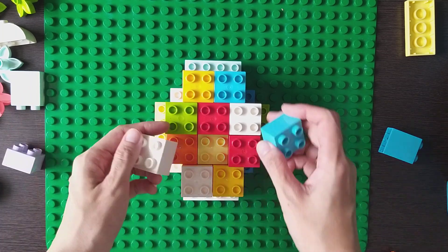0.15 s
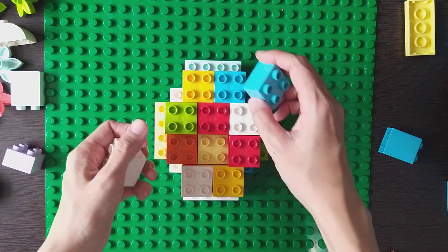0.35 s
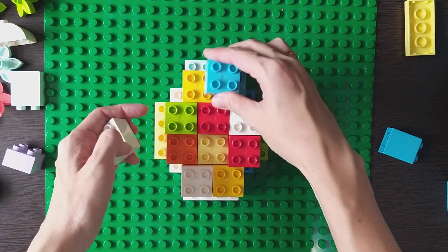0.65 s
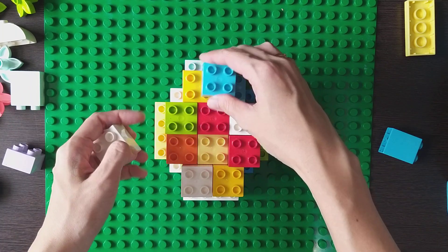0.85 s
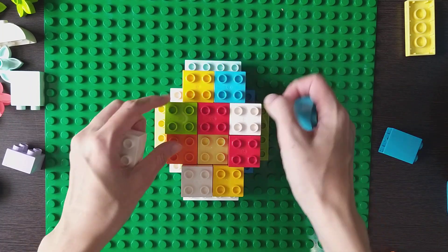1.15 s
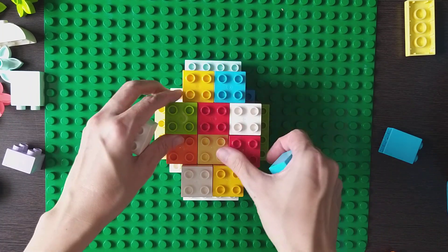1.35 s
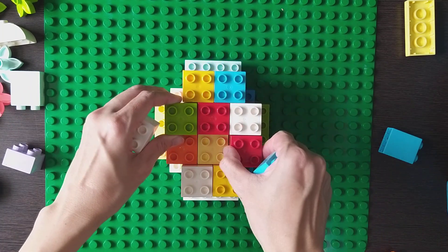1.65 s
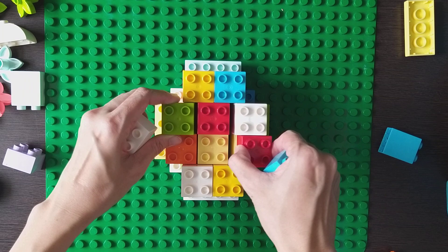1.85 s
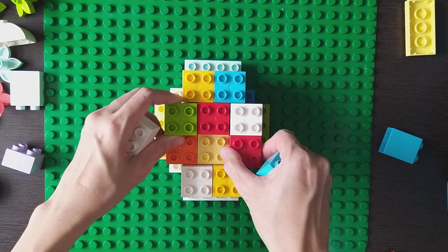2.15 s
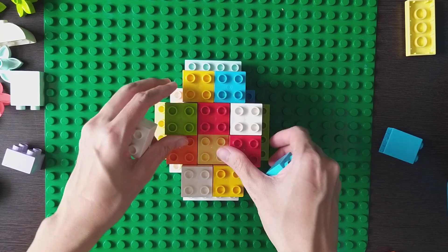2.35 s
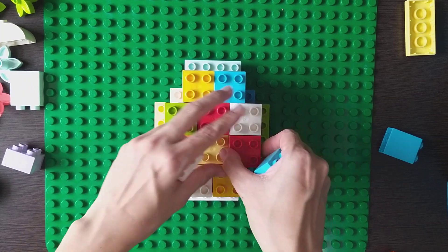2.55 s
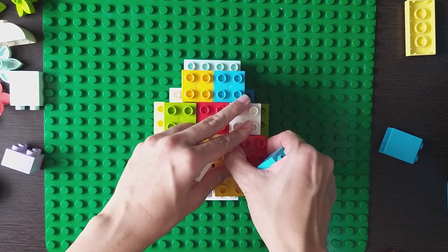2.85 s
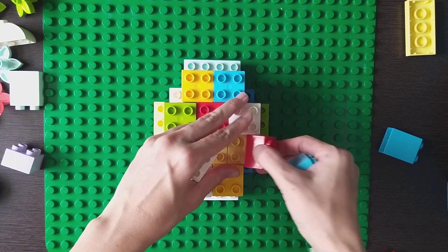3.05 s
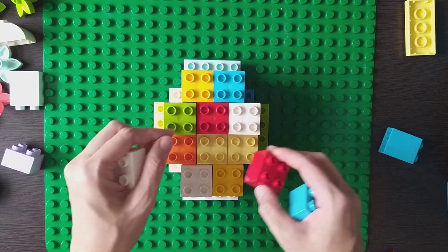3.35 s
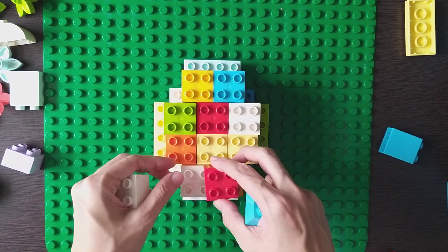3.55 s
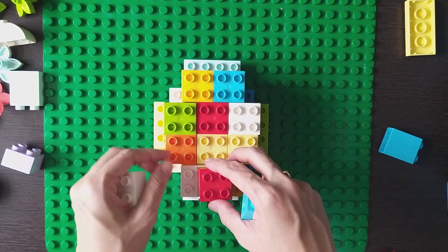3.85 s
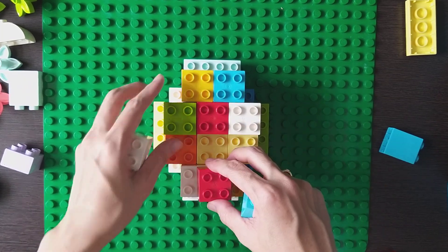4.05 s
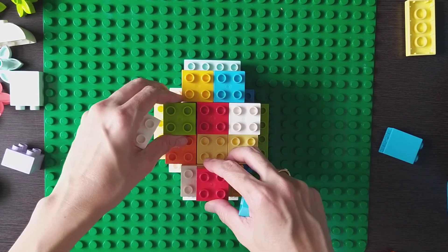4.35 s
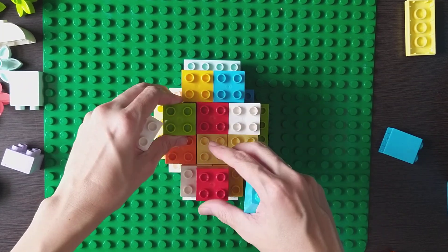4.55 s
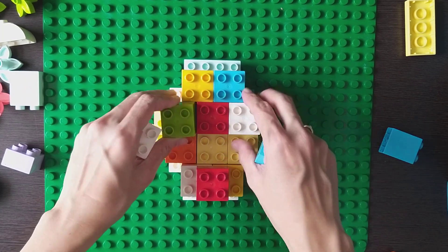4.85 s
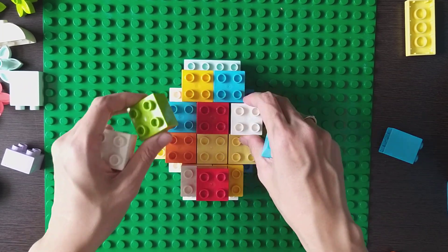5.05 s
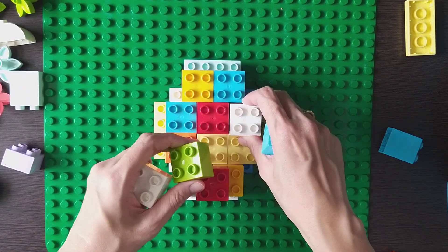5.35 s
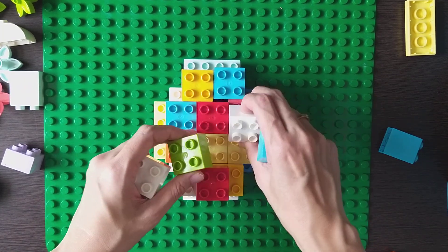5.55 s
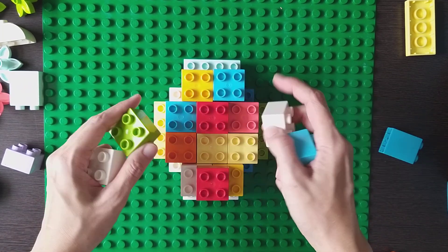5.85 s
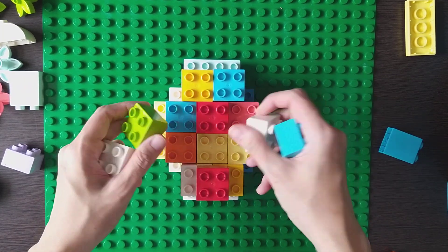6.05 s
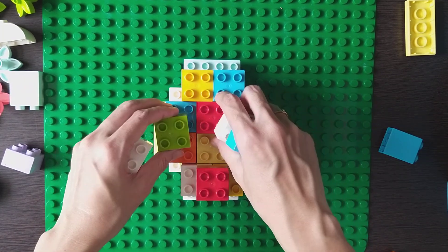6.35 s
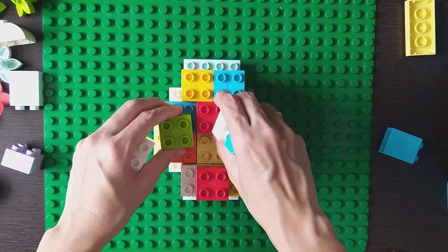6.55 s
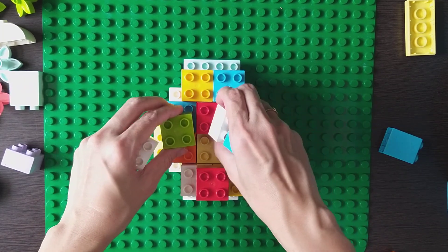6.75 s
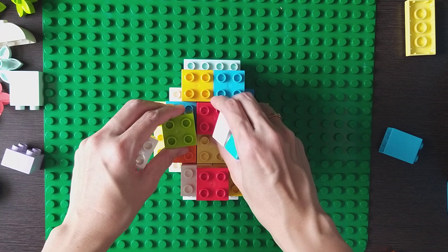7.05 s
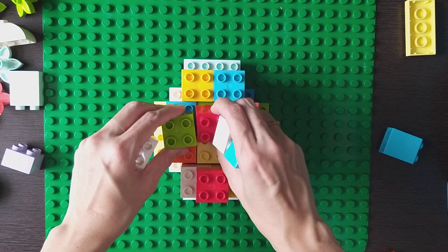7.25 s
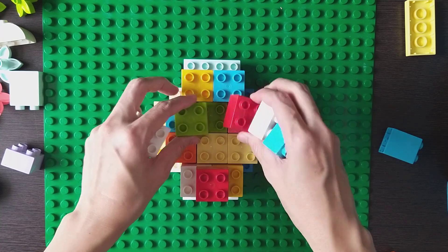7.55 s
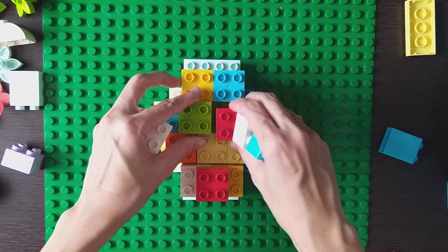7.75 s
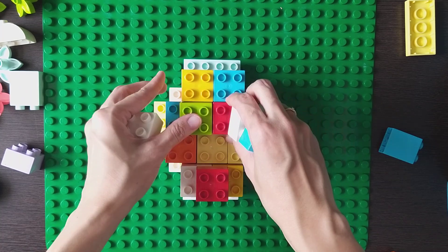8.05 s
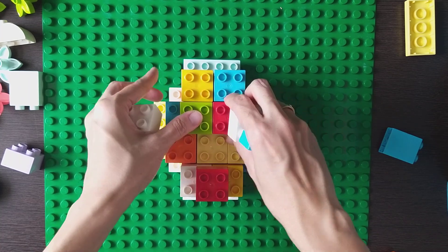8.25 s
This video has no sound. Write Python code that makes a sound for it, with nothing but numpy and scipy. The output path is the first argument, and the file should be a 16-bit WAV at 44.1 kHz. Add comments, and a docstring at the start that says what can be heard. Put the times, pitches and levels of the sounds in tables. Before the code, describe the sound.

Chunky plastic building bricks are knocked together in the hands and snapped onto a studded plate on a table, over faint hiss and low rumble.

```python
"""Over faint hiss and a low rumble, one engine hums past outside; fingertips rub plastic.
Hollow toy bricks are pressed onto a baseplate on a table and knocked together; now and then an edge scrapes.
A second engine swells midway; then come the loudest knocks in the hand, presses in quick runs, and a last knock.
Damped modes of cavity, walls, plate and table ring at each contact; noise bursts crack as studs snap.
Noise makes rubbing, hiss and rumble; sines make exhaust notes; decaying noise bands make the small room."""
import sys
import numpy as np
from scipy import signal
from scipy.fft import rfft, irfft, next_fast_len
from scipy.io import wavfile

SR = 44100
rng = np.random.default_rng(int(sys.argv[2]) if len(sys.argv) > 2 else 0)


def bounce(signal):
    """Save signal as a 16-bit WAV file at the path given by the first command-line argument."""
    frames = np.transpose(np.atleast_2d(signal))
    limited = np.clip(frames, -1, 1)
    pcm = np.round(limited * 32767).astype(np.int16)
    wavfile.write(sys.argv[1], SR, pcm)


N = 370881
HIT_SIZE = SR // 5   # samples per contact

# low rumble that rises and falls, partly with the handling: start_s [s], level_db [dB]
RUMBLE_LEVELS = [(0.0, -65.5), (0.63, -57.5), (1.22, -55.5), (1.78, -62), (2.06, -52), (3.35, -61),
                 (4.8, -53.5), (5.76, -57.5), (6.11, -61.5), (8.08, -57), (8.41, -55)]
# low rumble: freq_hz [Hz], density_db [dB per Hz]
RUMBLE_COLOUR = [(20, -27), (40, -21), (50, -2), (63, 0), (100, 0), (160, 0), (220, -12.5), (320, -17),
                 (450, -20.5), (800, -44.5), (2000, -58)]
# engines outside, one list each: start_s [s], turns_hz [turns per s], level_db [dB]
ENGINE_CURVES = [
    [(0, 29.6, -69), (.65, 32.2, -54), (1.35, 30.1, -54.5), (1.7, 26.8, -67), (2.7, 39.3, -57),
     (3.2, 31, -75)],
    [(4.1, 37, -77), (4.55, 45.2, -45.5), (4.75, 43.5, -56), (5.05, 44.5, -52), (5.4, 43.3, -61.5),
     (6.6, 44, -68.5), (7.3, 51.6, -66), (8.4, 46, -67.5)],
]
# exhaust notes, one list per engine: multiple [of turning rate], level_db [dB]
EXHAUST_ORDERS = [
    [(2, -4), (3, -17), (4, -1), (6, -5.5)],
    [(2, -5.5), (3, -10), (4, -1)],
]
# faint hiss: freq_hz [Hz], density_db [dB per Hz]
HISS_COLOUR = [(300, 8.5), (1000, -2), (2800, -4.5), (5000, -4.5), (9000, -7), (15000, -6.5)]
# small room: freq_hz [Hz], wet_db [dB, reverberant against direct energy], t60_s [s]
ROOM_BANDS = [(100, -5, 0.31), (302, -0.5, .36), (600, 0, .3), (1200, -3, 0.33), (2780, -4.5, 0.38),
              (5800, -4.5, 0.34), (9900, -5.5, 0.4), (15000, -2, 0.25)]
# fingertip strokes: start_s [s], end_s [s], level_db [dB]
RUB_STROKES = [(0, 0.022, -74.5), (1.587, 1.876, -80.5), (2.329, 2.381, -74), (2.695, 3.06, -69),
               (4.165, 4.2, -77), (4.872, 5.0, -73.5), (6.838, 7.43, -72.5), (7.892, 8.41, -63)]
# skin on plastic: freq_hz [Hz], density_db [dB per Hz]
SKIN_COLOUR = [(500, 0.5), (1500, -2), (3000, -0.5), (6000, -1.5), (8000, -10.5), (15000, -25.5)]
# bricks grate on their neighbours: start_s [s], end_s [s], level_db [dB]
EDGE_SCRAPES = [(0.71, 0.762, -62), (2.079, 2.168, -74.5), (2.333, 2.377, -93), (2.825, 2.866, -54.5),
                (3.677, 3.76, -77), (5.539, 5.6, -49), (6.372, 6.46, -51), (6.848, 6.971, -63),
                (7.243, 7.346, -71), (7.6, 7.65, -51), (7.81, 7.944, -62), (8.04, 8.19, -66)]
# deep table-top modes: freq_hz [Hz], level_db [dB], t60_s [s]
TABLE_MODES = [(59.6, -11, .3), (89, -7, 0.057), (102.5, -1, 0.3), (175, -14, 0.3)]
# bending modes of the plate lying on the table: freq_hz [Hz], level_db [dB], t60_s [s]
BENDING_MODES = [(250, 1.5, 0.091), (304, 5.5, .045), (336.2, 0, 0.28), (445, 1, 0.021), (540, -7.5, 0.035),
                 (760, -10, 0.0067), (1066, -8, 0.06)]
# clacking baseplate modes: freq_hz [Hz], level_db [dB], t60_s [s]
PLATE_MODES = [(574, -3, 0.0056), (680, -6, 0.033), (830, -1, 0.0098), (973, -5, 0.014), (1180, 3, 0.016),
               (1230, -3, 0.013), (1582, 6.5, 0.0096), (1730, 0, 0.05), (2088, 3.5, 0.022)]
# weaker, crowded modes of a hollow brick: freq_hz [Hz], level_db [dB], t60_s [s]
SHELL_MODES = [(2450, -8.5, .016), (2474, 3, 0.023), (2798, -1, 0.048), (2805, -7.5, 0.0076),
               (3110, 0.5, 0.022), (3100, 3, 0.012), (3720, -9, 0.012), (4010, -2.5, 0.012),
               (4000, -9.5, 0.018), (4580, -14.5, 0.0053)]
# high modes of brick corners and inner tubes: freq_hz [Hz], level_db [dB], t60_s [s]
CORNER_MODES = [(4750, -3.5, 0.036), (5230, -1, 0.019), (5950, 2.5, 0.027), (6670, -8.5, 0.013),
                (8770, 2, .04), (9800, -14.5, .025), (12000, -12, .025), (12750, -5.5, .02),
                (14000, -18, .015)]
# crack of a stud slipping into its seat: freq_hz [Hz], density_db [dB per Hz]
SNAP_COLOUR = [(1000, -27.5), (3500, 1.5), (5000, -2.5), (6500, 0.5), (7800, -9), (9500, -7), (12500, -5.5),
               (15500, -8)]
# bricks knocked together in the hand:
# start_s [s], cavity_db [dB], cavity_hz [Hz], wall_db [dB], wall_hz [Hz], snap_db [dB]
HAND_KNOCKS = [(0.889, -40, 2537, -35, 4280, -44), (1.1249, -29.5, 3053, -30.5, 3845, -54.5),
               (3.07, -52.5, 3080, -48, 4830, -51.5), (3.605, -43.5, 2960, -51, 3800, -68),
               (3.6335, -40, 3000, -58, 3600, -66), (5.831, -20, 2625, -25.5, 3870, -34.5),
               (5.847, -32, 2670, -36.5, 3890, -40), (6.029, -29.5, 2500, -29.5, 4400, -37.5),
               (6.0367, -16.5, 2406, -23.5, 3820, -31.5), (6.0565, -26, 2410, -26.5, 4610, -37.5),
               (6.1914, -13, 2745, -16, 4030, -26.5), (6.344, -32, 2550, -39, 3980, -51),
               (6.354, -23, 2740, -28, 3887, -45), (7.349, -46.5, 2820, -54, 3800, -52.5),
               (7.368, -40.5, 2934, -47.5, 3830, -56), (7.5265, -56, 2740, -59, 3890, -60.5),
               (8.3445, -31.5, 2605, -46.5, 4350, -56.5)]
# brick set down, pressed home or pulled off:
# start_s [s], thud_db [dB], thud_hz [Hz], clack_db [dB], cavity_db [dB], cavity_hz [Hz], snap_db [dB]
PLATE_PRESSES = [(0.658, -41, 260, -41, -32, 2660, -44), (0.7034, -43.5, 314, -30.5, -23.5, 2570, -38),
                 (0.744, -51.5, 255, -39.5, -34, 2770, -48.5), (0.8876, -47, 230, -43.5, -37, 2600, -42.5),
                 (2.1707, -33, 435.3, -48, -54.5, 3185, -43.5), (2.811, -33.5, 284, -41, -43, 2310, -44),
                 (2.8195, -44, 294, -48, -44.5, 1970, -44.5), (3.548, -55, 276, -42, -36, 2910, -57.5),
                 (3.6776, -44, 270, -37, -34.5, 2430, -51.5), (3.682, -54, 263, -53.5, -37.5, 2980, -62),
                 (4.7246, -41.5, 235, -40.5, -53, 1940, -44.5), (5.529, -37, 234, -44, -45.5, 1930, -46),
                 (5.537, -38.5, 223, -41, -31.5, 1970, -34), (5.62, -46.5, 210, -42, -33.5, 2050, -40),
                 (6.388, -48, 243, -51, -28, 2650, -57), (6.431, -46.5, 272, -45, -29.5, 2790, -39.5),
                 (6.449, -48.5, 245, -44.5, -32, 2700, -43.5), (6.801, -50.5, 234, -81, -42.5, 2650, -55.5),
                 (7.026, -53, 231, -65, -44, 2520, -62.5), (7.093, -52, 227, -58.5, -41.5, 2400, -64),
                 (7.233, -40, 231, -55, -50.5, 2232, -61), (7.244, -48.5, 234, -53.5, -44.5, 2420, -66),
                 (7.5844, -47.5, 236, -37.5, -26.5, 2740, -43.5), (7.607, -44, 238, -31, -30, 2870, -37.5),
                 (7.6132, -45.5, 232, -40, -48, 2700, -46), (7.7934, -42, 300, -36.5, -33.5, 2830, -47),
                 (7.8377, -39.5, 275, -40.5, -43, 2630, -49), (8.0225, -42, 255, -44.5, -38, 2523, -43.5),
                 (8.1403, -41, 235, -47.5, -51.5, 1800, -55.5)]
# fingers nudge seated bricks: start_s [s], thud_db [dB], clack_db [dB]
SEATED_NUDGES = [(2.121, -50.5, -61.5), (2.9568, -56, -64), (3.072, -52, -75.5), (3.805, -52, -75),
                 (4.162, -55, -65.5), (4.884, -54.5, -59.5), (5.323, -50.5, -67), (5.7297, -58, -60.5),
                 (6.398, -48, -49.5), (6.531, -47.5, -62), (6.661, -52, -62), (6.85, -50.5, -64),
                 (6.862, -51.5, -57), (7.911, -55, -58)]

# half-octave room bands
BAND_EDGES_HZ = 22 * 2 ** np.arange(0, 9.6, .5)
BAND_CENTRES_HZ = np.sqrt(BAND_EDGES_HZ[1:] * BAND_EDGES_HZ[:-1])

HISS_DB = -73.5
STROKE_FADE_DB_PER_S = 129   # onset and decay of a stroke
SLIPS_PER_SCRAPE = 12   # mean count: similar travel each time, so a slow scrape slips less often
SOFT_PUSH_HZ = 242.2   # thud note of a slow, soft push
THUMP_DB_PER_OCTAVE = -17   # a quicker push rocks the table less
KNOCK_THUD_DB = -65   # the hand keeps nearly all of a knock from the table
KNOCK_CLACK_DB, KNOCK_SHEEN_DB = -28.5, -7.5   # plate re cavity; sheen re snap
KNOCK_PAN_DB, PRESS_PAN_DB = 1, 3.5   # left re right
PRESS_WALL_DB, PRESS_SHEEN_DB = -4, -7.5   # wall re cavity in a firm press; sheen re snap
FIRM_CLACK_DB, WALL_DB_PER_CLACK_DB = -37.5, .33   # clack of a firm press; wall gain per clack gain
SHEEN_DB_PER_SNAP_DB = .25   # extra sheen per dB of snap above cavity
WALL_HZ, WALL_SPREAD = 3846, .015   # mean wall note on the plate; relative spread
NUDGE_CAVITY_HZ, NUDGE_CAVITY_DB, NUDGE_SNAP_DB = 2430, 3.5, -3   # levels re clack


def from_db(db):
    """Decibels to gain."""
    return 10 ** (np.asarray(db) / 20)


def rms_one(x):
    """Scale each channel to an rms of 1."""
    return x / np.sqrt(np.mean(x ** 2, axis=-1, keepdims=True) + 1e-20)


def hit_level(x, db):
    """Scale each channel of a hit to the energy of 10 ms of sound at db."""
    energy = np.sum(x ** 2, axis=-1, keepdims=True)
    return from_db(db) * x * np.sqrt(SR / 100 / energy)


def in_time(rows):
    """Interpolate the columns of a curve at every sample."""
    time_s, *columns = np.transpose(rows)
    return [np.interp(np.arange(N) / SR, time_s, column) for column in columns]


def at_hz(points, hz):
    """Read the columns of a spectrum on a log-frequency axis."""
    freq_hz, *columns = np.transpose(points)
    return [np.interp(np.log(hz + 1), np.log(freq_hz), column) for column in columns]


def high_pass(x, hz):
    """Small parts radiate little below their first mode."""
    return signal.sosfilt(signal.butter(3, hz, "high", fs=SR, output="sos"), x)


def low_pass(x, hz):
    """A contact that lasts a while leaves out the highest tones."""
    return signal.sosfilt(signal.butter(4, min(hz, .45 * SR), fs=SR, output="sos"), x)


def coloured(spectrum, size, likeness):
    """Stereo noise of a given colour and left-right likeness; rms 1."""
    mid, side = rng.standard_normal((2, next_fast_len(size, True)))
    alike = np.clip(likeness, 0, 1)
    white = np.sqrt(1 + alike) * mid + np.sqrt(1 - alike) * np.array([side, -side])
    density_db, = at_hz(spectrum, np.fft.rfftfreq(len(mid), 1 / SR))
    noise = irfft(rfft(white) * from_db(density_db), len(mid))
    return rms_one(noise[:, :size])


def drift(rate_hz):
    """Slow random curve through knots of spread 1, rate_hz knots per second."""
    steps = np.arange(N) / SR * rate_hz
    knots = rng.standard_normal(2000)
    return np.interp(steps, np.arange(len(knots)), knots)


def ring(force, hz, t60_s):
    """One damped mode driven by a force, a two-pole resonator; rms 1."""
    radius = from_db(-60 / (t60_s * SR))
    angle = 2 * np.pi * hz / SR
    floor = 1e-18 * (-1) ** np.arange(force.shape[-1])   # tiny alternating input, inaudible
    poles = [1, -2 * radius * np.cos(angle), radius * radius]
    return rms_one(signal.lfilter([1, 0, -1], poles, force + floor))


def body(force, modes, scatter_db, detune):
    """Every contact finds a body's modes with new strengths and slightly shifted pitch; rms 1."""
    shift = 1 + detune * rng.normal()
    total = 0
    for k, (hz, level_db, t60_s) in enumerate(modes):
        gain = from_db(level_db + scatter_db * rng.normal())
        total = total + (-1) ** k * gain * ring(force, hz * shift, t60_s)
    return rms_one(total)


def hiss():
    """Faint steady noise, nearly independent left and right."""
    return from_db(HISS_DB) * coloured(HISS_COLOUR, N, likeness=0.06)


def rumble():
    """Low noise that rises and falls, partly with the handling; nearly alike left and right."""
    level_db, = in_time(RUMBLE_LEVELS)
    return from_db(level_db) * coloured(RUMBLE_COLOUR, N, likeness=0.9)


def engines():
    """Low exhaust notes from outside: sines at multiples of each engine's unsteady turning rate."""
    out = np.zeros(N)
    for curve, orders in zip(ENGINE_CURVES, EXHAUST_ORDERS):
        turns_hz, engine_db = in_time(curve)
        phase = 2 * np.pi * np.cumsum(turns_hz * (1 + 0.0025 * drift(rate_hz=16))) / SR
        for multiple, order_db in orders:
            note_db = engine_db + order_db + 2.5 * drift(rate_hz=6)
            out = out + np.sqrt(2) * from_db(note_db) * np.sin(round(multiple) * phase)
    return out


def room(x):
    """Dense reflections that build up after the first wall and die away band by band."""
    t = np.arange(round(.7 * SR)) / SR
    build_up = np.clip((t - .006) / 0.0044, 0, 1)
    white = rng.standard_normal((2, 2, len(t)))   # neighbouring bands alternate sources
    response = 0
    for k, hz in enumerate(BAND_CENTRES_HZ):
        band = signal.butter(2, BAND_EDGES_HZ[k:k + 2], "band", fs=SR, output="sos")
        wet_db, t60_s = at_hz(ROOM_BANDS, hz)
        tail = build_up * from_db(-60 * t / t60_s)
        shared = 1 / (1 + (hz / 400) ** 2)   # long waves reach both microphones alike
        left, other = white[k % 2]
        right = np.sqrt(shared) * left + np.sqrt(1 - shared) * other
        noise = signal.sosfilt(band, [left, right])
        response = response + from_db(wet_db) * noise * tail / np.sqrt(np.sum(tail ** 2))
    return signal.fftconvolve(x, response, axes=1)[:, :N]


def fingers():
    """Skin sticks and slips on plastic: grainy hiss that swells, holds and fades with each stroke."""
    t = np.arange(N) / SR
    strokes_db = []
    for start_s, end_s, level_db in RUB_STROKES:
        outside_s = np.abs(t - np.clip(t, start_s, end_s))
        strokes_db.append(level_db - STROKE_FADE_DB_PER_S * outside_s)
    grain_db = 3.6 * drift(rate_hz=70)
    return from_db(np.max(strokes_db, axis=0) + grain_db) * coloured(SKIN_COLOUR, N, likeness=0.057)


def contact_force(chatter_s, chatter_db, bounce_s, bounce_db):
    """A blow as left, right and room channels: hard edges chatter, hands and table bounce it.
    Each microphone gets its own bounces; over all directions feeding the room the pattern averages out."""
    force = np.zeros((3, HIT_SIZE))
    force[:, 0] = 1
    lags = (rng.uniform(.1, 1, 4) * chatter_s * SR).astype(int)
    force[:2, lags] += from_db(chatter_db) * rng.choice([-1, 1], len(lags))
    for side in force[:2]:
        lags = (rng.uniform(.1, 1, 8) * bounce_s * SR).astype(int)
        side[lags] += from_db(bounce_db) * rng.normal(0, 1, len(lags))
    return force


def scrapes():
    """Edges slide in tiny uneven slips that tickle the plate and the brick walls."""
    out = np.zeros((3, N + HIT_SIZE))
    t = np.arange(HIT_SIZE) / SR
    for start_s, end_s, level_db in EDGE_SCRAPES:
        at = round(start_s * SR)
        sliding = t < np.clip(end_s - start_s, .01, .2)
        slipping = rng.random(HIT_SIZE) < SLIPS_PER_SCRAPE / sliding.sum()
        slips = slipping * rng.normal(0, 1, HIT_SIZE) * sliding
        slips[0] = 1   # the edge breaks loose
        blow = contact_force(chatter_s=0.00083, chatter_db=2.5, bounce_s=.009, bounce_db=-3)
        force = signal.fftconvolve([slips], blow, axes=1)[:, :HIT_SIZE]
        plate = body(force, PLATE_MODES, scatter_db=2.5, detune=0.066)
        walls = from_db(6.5) * body(force, SHELL_MODES, scatter_db=1.5, detune=0.035)
        grating = rms_one(low_pass(plate + walls, hz=5500))
        out[:, at:at + HIT_SIZE] += from_db(level_db) * grating * np.sqrt(sliding.mean())
    return out[:, :N]


def thumps():
    """Each push on the plate rocks the table top, the more so the softer and heavier it is."""
    out = np.zeros(N + HIT_SIZE)
    push = low_pass(signal.unit_impulse(HIT_SIZE), hz=220)
    pushes = []
    for start_s, thud_db, thud_hz, *_ in PLATE_PRESSES:
        pushes.append((start_s, thud_db + THUMP_DB_PER_OCTAVE * np.log2(thud_hz / SOFT_PUSH_HZ)))
    for start_s, level_db, *_ in pushes + list(SEATED_NUDGES):
        at = round(start_s * SR)
        rocking = body(push, TABLE_MODES, scatter_db=1.5, detune=0.038)
        out[at:at + HIT_SIZE] += hit_level(rocking, level_db)
    return out[:N]


def place(x, pan_db):
    """The nearer microphone hears a brick louder and up to two samples sooner."""
    left_gain, right_gain = rms_one(from_db([pan_db / 2, -pan_db / 2]))
    lag = round(np.clip(pan_db / 2, -1, 2))
    left = left_gain * np.roll(x[0], max(-lag, 0))
    right = right_gain * np.roll(x[1], max(lag, 0))
    return np.array([left, right, x[2]])


def thud_of(force, thud_hz):
    """The plate bends on the table: one strongest note plus its bending modes."""
    # long waves reach both sides nearly alike
    push = low_pass(np.array([force[0], 0.47 * force[0] + 0.44 * force[1], force[2]]), hz=910)
    strongest = ring(push, thud_hz, t60_s=.07)
    stiffer = (thud_hz / 290) ** .4   # a tightly seated stack raises all bending modes
    bending = [(hz * stiffer, level_db, t60_s) for hz, level_db, t60_s in BENDING_MODES]
    return strongest + from_db(3.5) * body(push, bending, scatter_db=2.0, detune=0.098)


def brick_of(force, cavity_db, cavity_hz, wall_db, wall_hz):
    """A hollow brick rings by its cavity, its walls and its crowded shell modes."""
    cavity = low_pass(high_pass(ring(force, cavity_hz, t60_s=.026), hz=1960), hz=4020)
    wall = low_pass(high_pass(ring(force, wall_hz, t60_s=0.015), hz=2780), hz=4900)
    shell = body(force, SHELL_MODES, scatter_db=2, detune=.025)
    shell = low_pass(high_pass(shell, hz=2200), hz=4800)
    shell_db = .3 * cavity_db + 0.69 * wall_db - 4.0
    return hit_level(cavity, cavity_db - 0.77) + hit_level(wall, wall_db - 2.0) + hit_level(shell, shell_db)


def treble_of(force, free):
    """Stud crack, a decaying noise burst, mixed with ringing corners by the power share free."""
    t = np.arange(HIT_SIZE) / SR
    crack = coloured(SNAP_COLOUR, HIT_SIZE, likeness=0.27) * np.exp(-t / .006)
    crack = rms_one(np.vstack([crack, crack.mean(axis=0)]))
    corners = body(force, CORNER_MODES, scatter_db=2, detune=.022)
    return np.sqrt(free) * corners + np.sqrt(1 - free) * crack


def contact(thud_db, thud_hz, plate_db, cavity_db, cavity_hz, wall_db, wall_hz, snap_db, sheen_db, pan_db):
    """One touch of plastic on plastic: the sum of the parts it sets ringing, as left, right, room."""
    force = contact_force(chatter_s=.004, chatter_db=-7, bounce_s=.007, bounce_db=-6.5)
    thud = thud_of(force, thud_hz)
    plate = body(force, PLATE_MODES, scatter_db=1.5, detune=0.1)
    plate = low_pass(high_pass(plate, hz=517), hz=2350)
    brick = brick_of(force, cavity_db, cavity_hz, wall_db, wall_hz)
    free = np.clip((cavity_db - thud_db) / 70, 0, .35)   # corners ring more on a brick held in the air
    treble = treble_of(force, free)
    snap = hit_level(low_pass(high_pass(treble, hz=4466), hz=7400), snap_db + .3)
    sheen = hit_level(high_pass(treble, hz=8040), sheen_db - .5)
    return hit_level(thud, thud_db) + place(hit_level(plate, plate_db) + brick + snap + sheen, pan_db)


def knock(cavity_db, cavity_hz, wall_db, wall_hz, snap_db):
    """A brick in the air rings freely and hardly stirs plate or table."""
    return contact(KNOCK_THUD_DB, SOFT_PUSH_HZ, cavity_db + KNOCK_CLACK_DB, cavity_db, cavity_hz,
                   wall_db, wall_hz, snap_db, snap_db + KNOCK_SHEEN_DB, KNOCK_PAN_DB)


def press(thud_db, thud_hz, clack_db, cavity_db, cavity_hz, snap_db):
    """A harder landing rings the walls more; a drier stud snap is brighter."""
    wall_db = cavity_db + PRESS_WALL_DB + WALL_DB_PER_CLACK_DB * (clack_db - FIRM_CLACK_DB)
    wall_hz = WALL_HZ * (1 + WALL_SPREAD * rng.normal())
    sheen_db = snap_db + PRESS_SHEEN_DB + SHEEN_DB_PER_SNAP_DB * (snap_db - cavity_db)
    return contact(thud_db, thud_hz, clack_db, cavity_db, cavity_hz,
                   wall_db, wall_hz, snap_db, sheen_db, PRESS_PAN_DB)


def nudge(thud_db, clack_db):
    """A soft press on a seated brick: a dull thud with a faint tick."""
    return press(thud_db, SOFT_PUSH_HZ, clack_db, clack_db + NUDGE_CAVITY_DB, NUDGE_CAVITY_HZ,
                 clack_db + NUDGE_SNAP_DB)


def bricks():
    """Sum all knocks, presses and nudges at their start times."""
    out = np.zeros((3, N + HIT_SIZE))
    for sound, rows in ((knock, HAND_KNOCKS), (press, PLATE_PRESSES), (nudge, SEATED_NUDGES)):
        for start_s, *touch in rows:
            at = round(start_s * SR)
            out[:, at:at + HIT_SIZE] += sound(*touch)
    return out[:, :N]


def scene():
    """Bricks, table and fingers in the room, a little to the left, over rumble, engines and faint hiss."""
    play = bricks() + thumps() + scrapes()
    rub = fingers()
    direct = play[:2] + rub
    radiated = play[2] + rub
    balance = from_db([[.4], [-.4]])
    return (direct + room(radiated)) * balance + rumble() + engines() + hiss()


def record(dry):
    """Cut the top steeply above 15.6 kHz."""
    return signal.sosfilt(signal.ellip(10, .1, 80, 15600, fs=SR, output="sos"), dry)


dry = scene()
out = record(dry)
bounce(out)
```